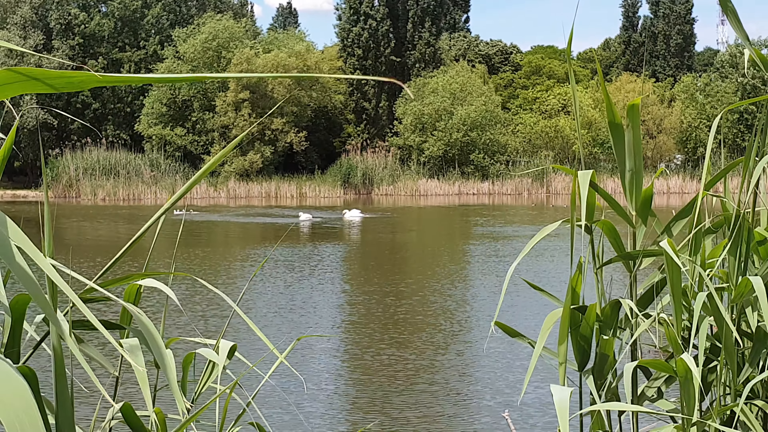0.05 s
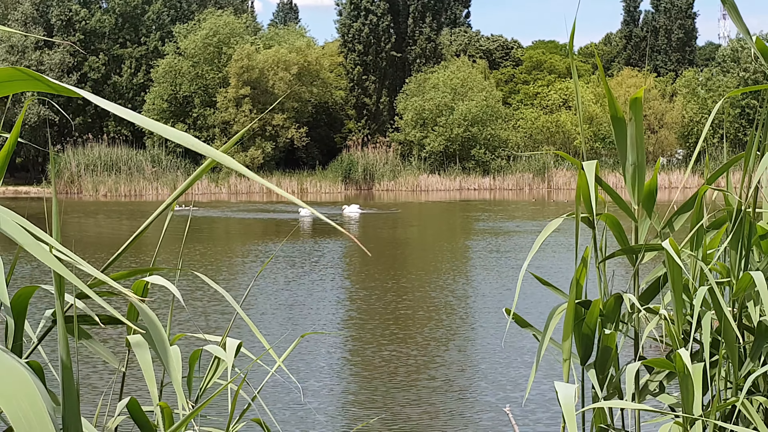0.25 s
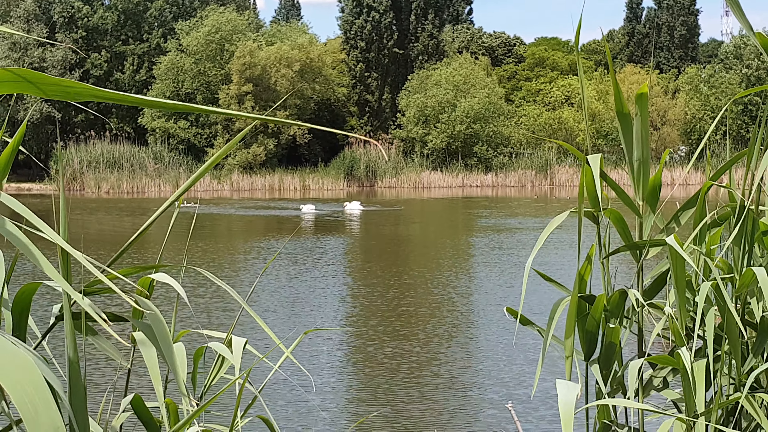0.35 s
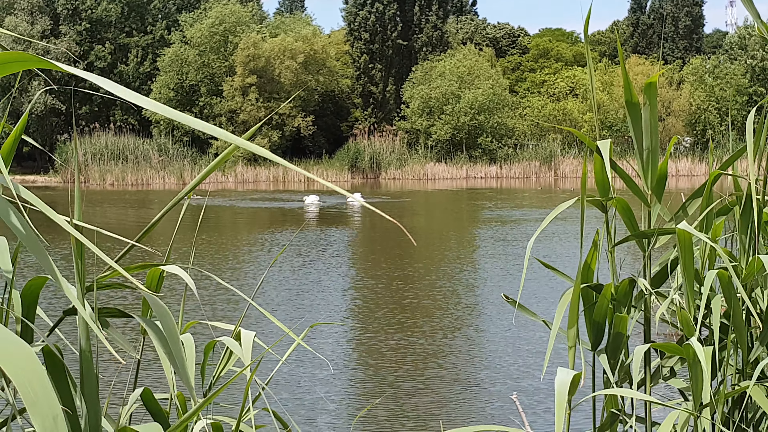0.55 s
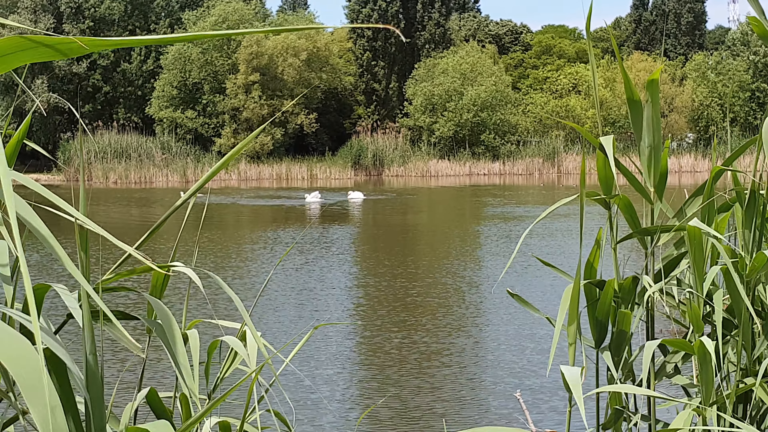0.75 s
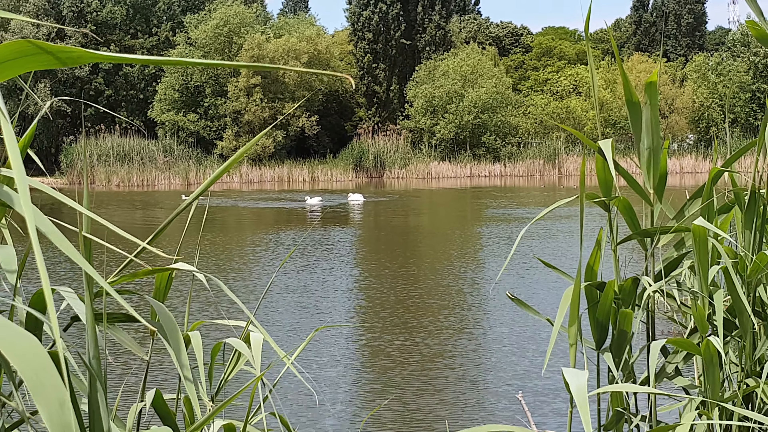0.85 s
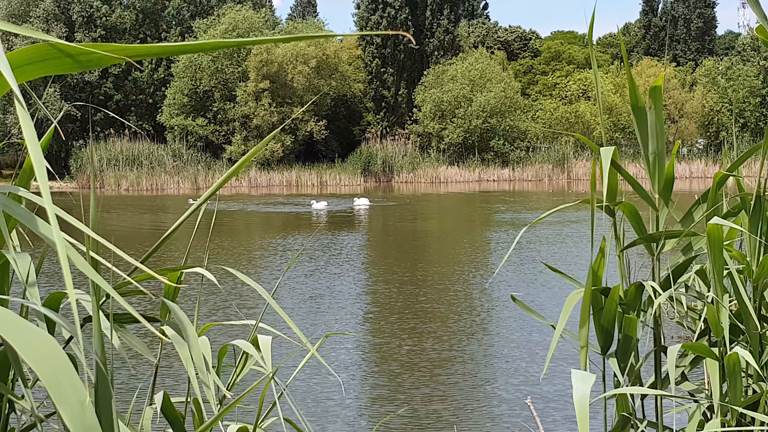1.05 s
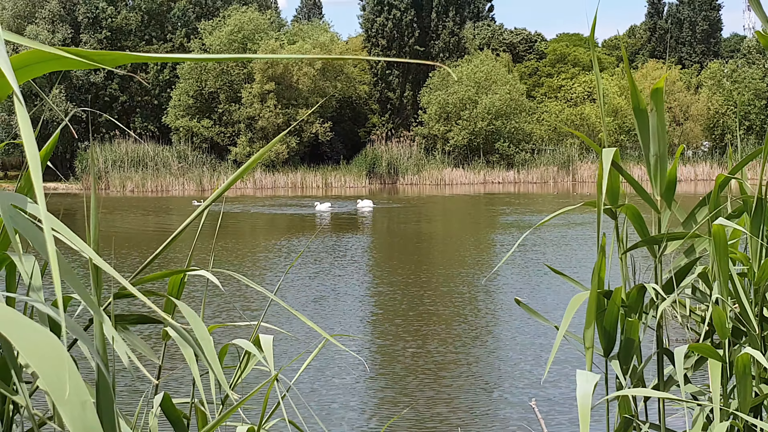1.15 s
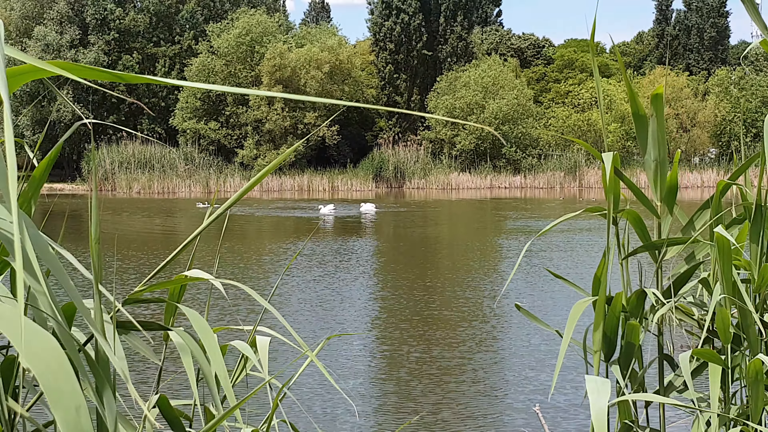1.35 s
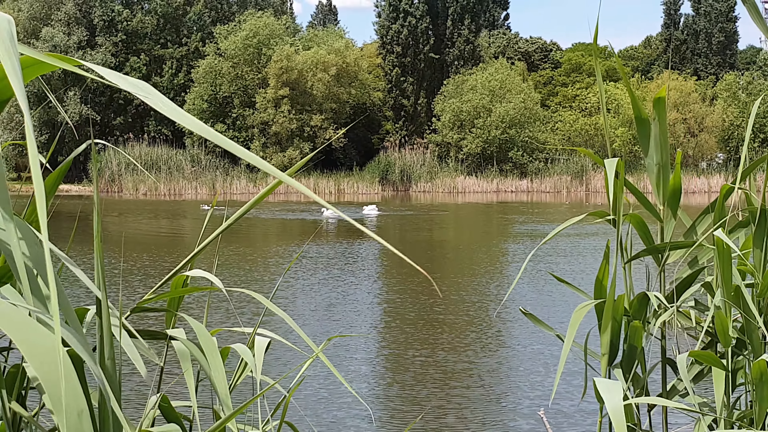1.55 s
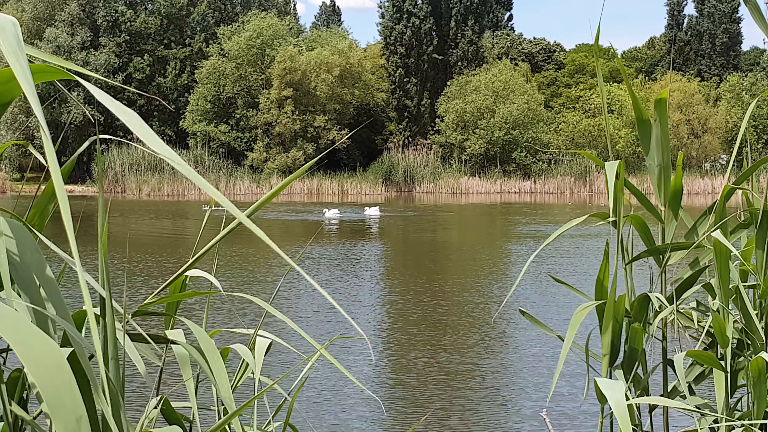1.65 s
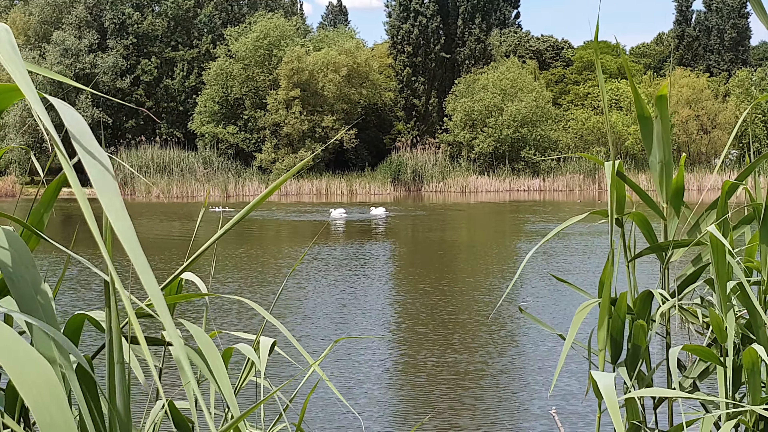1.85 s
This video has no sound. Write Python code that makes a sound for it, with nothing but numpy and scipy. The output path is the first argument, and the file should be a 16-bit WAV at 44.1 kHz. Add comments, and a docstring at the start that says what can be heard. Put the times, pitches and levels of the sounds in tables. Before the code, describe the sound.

Gusty wind thumps and rumbles on the microphone beside a reedy pond, with faint bird calls

```python
"""Wind at a reedy pond

A small microphone stands beside the pond; gusty wind buffets its two ports, mostly the right one:
low uneven cycles over filtered-noise rumble. In the reeds ringing ticks chatter, and late on a spray
of noise drops splashes. A bird chirps gliding overtones, early and at the end; far water birds call
hoarsely as resonant noise. Leaves and air hiss as random spectra; a far machine hums wavering tones."""
import sys
import numpy as np
from scipy import signal
from scipy.fft import rfft, irfft
from scipy.io import wavfile
from scipy.ndimage import uniform_filter1d

SR = 44100
rng = np.random.default_rng(int(sys.argv[2]) if len(sys.argv) > 2 else 0)


def wav_out(sig):
    """Save sig, one row per channel (or a flat mono array), as 16-bit PCM at SR to the path in sys.argv[1]."""
    wavfile.write(sys.argv[1], SR, np.round(np.clip(np.atleast_2d(sig).T, -1, 1) * 32767).astype(np.int16))


N = 83790  # 1.9 s
# phase lag of the right port, in turns, for every partial of the bird and the chatter
PORT_LAG_TURNS = np.array([[0], [0.26]])


def amp(db):
    """Amplitude factor for a level in dB."""
    return 10 ** (np.asarray(db) / 20)


def evened(x):
    """Scale each row to an RMS of 1."""
    return x / np.sqrt(np.mean(x ** 2, axis=-1, keepdims=True) + 1e-20)


def smoothed(x, samples):
    """Slow random drift: two running means, then an RMS of 1."""
    return evened(uniform_filter1d(uniform_filter1d(x, samples), samples))


def read(points, hz):
    """Read a frequency table on a logarithmic frequency axis."""
    f, value = np.transpose(points)
    return np.interp(np.log(hz + 1), np.log(f + 1), value)


def curve(table, column=1):
    """Gain over time from one dB column of a table."""
    columns = np.transpose(table)
    return amp(np.interp(np.arange(N) / SR, columns[0], columns[column]))


def coloured(x, colour):
    """Filter noise to a spectral shape, then even its level."""
    gain = amp(read(colour, np.fft.rfftfreq(N, 1 / SR)))
    return evened(irfft(rfft(x) * gain, N))


def resonate(x, hz, width_hz):
    """A gliding resonance: shift hz down to zero, low-pass with a double pole, shift back up."""
    turn = np.exp(2j * np.pi * np.cumsum(hz * np.ones(x.shape[-1])) / SR)
    pole = np.exp(-np.pi * width_hz / SR)
    double_pole = np.convolve([1, -pole], [1, -pole])
    return evened((turn * signal.lfilter([1], double_pole, x / turn)).real)


def add(mix, s, sound):
    """Lay a sound into the mix from s seconds, cut at the end of the scene."""
    part = mix[:, round(s * SR):][:, :sound.shape[-1]]
    part += sound[..., :part.shape[1]]


def sides(lean_db):
    """Left and right gains whose difference, left minus right, is lean_db."""
    return amp([[lean_db / 2], [-lean_db / 2]])


# partials of the flutter on a buffet's front: f/Hz before wobble, level/dB on top of the buffet's flutter
FLUTTER_PARTIALS = [(140, 2), (235, -8.5)]
FLUTTER_WOBBLE, FLUTTER_LEAD_S = 0.16, 0.0045
# pitch sag and random wobble as shares of the pitch; second harmonic and flapping as shares of the stroke
SAG, WOBBLE, LOPSIDED, FLAP = 0.24, 0.2, 0.1, 0.15


def buffets(table):
    """Each eddy pushes a port for lopsided, uneven cycles that sag in pitch, quicker flutter in front."""
    t, out = np.arange(N) / SR, np.zeros(N)
    slow, quick = smoothed(rng.standard_normal((2, N)), 250)
    for s, db, hz, length, flutter_db in table:
        start = rng.random(3)
        u = (t - s) / length
        pitch = hz * (1 - SAG * np.tanh(u)) * (1 + WOBBLE * slow)
        push = np.cumsum(pitch) / SR + start[0]
        stroke = np.cos(2 * np.pi * push)
        stroke += LOPSIDED * np.cos(2 * np.pi * (2 * push + start[1]))
        out += amp(db - 12.1 * u ** 2) * stroke * (1 + FLAP * quick)

        flutter_clock = np.cumsum(1 + FLUTTER_WOBBLE * quick) / SR
        front = u + FLUTTER_LEAD_S / length
        for (part_hz, part_db), part_start in zip(FLUTTER_PARTIALS, start[1:]):
            shape = amp(flutter_db + part_db - 18 * front ** 2)
            out += shape * np.cos(2 * np.pi * (part_hz * flutter_clock + part_start))
    return np.sqrt(2) * out


# buffets on each port: centre t/s, level/dB, f/Hz at the centre before wobble,
# length/s from the centre to 12.1 dB down, flutter level/dB before its partials' own levels
LEFT_BUFFETS = [(0.176, -37.5, 89, 0.018, -56), (0.241, -33.5, 76.7, 0.017, -44.5),
                (0.35, -39.5, 67.7, 0.013, -71), (0.459, -27.5, 125, 0.013, -65),
                (0.478, -20, 88, 0.012, -39), (0.522, -44, 74, 0.017, -75), (0.589, -38, 66, 0.06, -70),
                (0.692, -30, 69, 0.022, -65), (0.815, -35, 75, 0.021, -58), (0.908, -43, 74.8, 0.056, -68),
                (0.976, -37, 73, 0.017, -69), (1.064, -44, 60.5, 0.023, -67), (1.288, -38, 70, 0.016, -68),
                (1.388, -43, 68, 0.02, -54), (1.429, -37, 60, 0.011, -54), (1.466, -36.5, 64, 0.022, -66),
                (1.554, -37, 72.5, 0.036, -48.5), (1.588, -37.5, 71, 0.029, -70),
                (1.764, -38, 78.5, 0.0096, -55), (1.887, -39, 81, 0.022, -55)]
RIGHT_BUFFETS = [(0.398, -23, 62.53, 0.012, -38), (0.447, -39, 85, 0.013, -50),
                 (0.494, -25, 88, 0.024, -38.5), (0.519, -22, 89, 0.018, -32),
                 (0.568, -21.5, 106.8, 0.013, -26), (0.598, -35, 70, 0.012, -46),
                 (0.66, -25, 80, 0.028, -51), (0.707, -31, 84.55, 0.034, -59),
                 (0.759, -28.5, 84.85, 0.032, -33), (0.791, -24, 80.07, 0.038, -59),
                 (0.848, -35, 70.4, 0.021, -50), (0.879, -20, 70, 0.034, -28), (0.92, -18, 67, 0.02, -31),
                 (0.995, -24, 70.56, 0.024, -64), (1.082, -32.5, 65.85, 0.054, -73),
                 (1.136, -37, 97, 0.033, -47), (1.185, -29.5, 82, 0.021, -46.5),
                 (1.209, -31.5, 75.6, 0.02, -69), (1.255, -31.5, 61.3, 0.015, -62),
                 (1.29, -26.5, 68.3, 0.02, -50), (1.376, -20.5, 88.2, 0.035, -43),
                 (1.421, -23, 80.8, 0.018, -52), (1.512, -16.5, 91, 0.017, -33),
                 (1.572, -34, 75.2, 0.061, -60), (1.597, -45, 69.9, 0.038, -59),
                 (1.673, -36.5, 78.65, 0.045, -57), (1.807, -45, 93, 0.03, -74)]
# rumble between the buffets: t/s, left level/dB, right level/dB
RUMBLE_LEVELS = [(0.0, -43, -46), (0.1, -49, -50), (0.2, -37, -47), (0.3, -42.5, -48), (0.4, -42, -35),
                 (0.5, -35, -53), (0.6, -37.5, -30), (0.7, -41, -32.5), (0.8, -43, -33.5), (0.9, -36, -34),
                 (1.0, -42, -34), (1.1, -43, -40), (1.2, -46, -63), (1.3, -44, -29), (1.4, -39, -38),
                 (1.5, -52, -30), (1.6, -48, -49), (1.7, -45, -55.5), (1.8, -48, -37), (1.9, -43.5, -41.5)]
# spectral shape of the rumble: f/Hz, relative level/dB
RUMBLE_SHAPE = [(15, -32), (30, 8.5), (50, 8.5), (90, -0.5), (150, -3.5), (250, -21), (400, -99),
                (800, -63)]


def wind():
    """Turbulence at the microphone: rumble and buffets, unrelated on the two ports."""
    rumble = coloured(rng.standard_normal((2, N)), RUMBLE_SHAPE)
    rumble *= [curve(RUMBLE_LEVELS), curve(RUMBLE_LEVELS, column=2)]
    return rumble + [buffets(LEFT_BUFFETS), buffets(RIGHT_BUFFETS)]


# spray of the splash: t/s, level/dB
SPLASH_LEVELS = [(1.64, -67), (1.657, -55), (1.71, -53), (1.75, -50), (1.79, -52.5), (1.82, -60.5),
                 (1.85, -59), (1.89, -66)]
# spectral shape of the spray: f/Hz, relative level/dB per Hz
SPLASH_SHAPE = [(700, -27), (1050, -3), (2000, -3), (2700, -8.5), (3900, -3), (5200, -13), (8500, -24),
                (12000, -19), (15600, -22)]
# single loud drops: t/s, level/dB at the onset before the lean to the right, f/Hz
LOUD_DROPS = [(1.729, -39, 3870), (1.751, -37, 3920), (1.759, -46, 1100), (1.787, -42, 4040)]
DROPS_PER_S, DROP_SPREAD_DB = 3000, 3.5
PLOP_CYCLES = 3.6  # cycles in which a loud drop decays to 1/e


def splash():
    """A spray of drops of uneven size, as sparse filtered clicks, and a few decaying sine drops."""
    t = np.arange(N) / SR
    size = amp(DROP_SPREAD_DB * np.minimum(rng.exponential(1, N), 3))
    falls = rng.random(N) < DROPS_PER_S / SR
    drops = rng.standard_normal((2, N)) * size * falls
    out = coloured(drops, [(300, -48)] + SPLASH_SHAPE) * curve(SPLASH_LEVELS)
    out *= (t > SPLASH_LEVELS[0][0]) * (t < SPLASH_LEVELS[-1][0])
    for s, db, hz in LOUD_DROPS:
        turns = hz * t[:600]
        plop = np.exp(-turns / PLOP_CYCLES) * np.sin(2 * np.pi * turns)
        add(out, s, amp(db) * plop * sides(-9.0))
    return out


# syllables in the reeds: t/s, level/dB before attack, modes and lean, f/Hz
SYLLABLES = [(1.699, -40.5, 2243), (1.7403, -36.5, 2000), (1.7867, -39.5, 2100), (1.8324, -36.5, 2070),
             (1.878, -37, 2030)]
# ringing modes of a tick: f as a multiple of the syllable's pitch, level/dB on top of the syllable's
TICK_RINGS = [(.93, 2), (1.0, 4), (1.1, 3)]
TICK_GAP_S, TICK_FALL_DB = 0.0067, -10  # from one tick to the next
TICK_ATTACK_S, TICK_T60_S = 0.0061, 0.021


def chatter():
    """Each syllable is three short ringing ticks, each weaker than the one before."""
    out, t = np.zeros((2, N)), np.arange(2000) / SR
    attack = np.minimum(t / TICK_ATTACK_S, 1)
    for s, db, hz in SYLLABLES:
        for k in range(3):
            tick = 0
            for multiple, mode_db in TICK_RINGS:
                turns = multiple * hz * t + rng.random() - PORT_LAG_TURNS
                tick = tick + amp(mode_db) * np.sin(2 * np.pi * turns)
            decay = amp(db + k * TICK_FALL_DB - 60 * t / TICK_T60_S)
            add(out, s + k * TICK_GAP_S, decay * attack * tick)
    return out * sides(-2.1)


# bird notes: start t/s, length/s, first f/Hz, last f/Hz (both before jitter),
# level/dB before overtone and throat
BIRD_NOTES = [(0.077, 0.018, 1387, 1810, -59.5), (0.088, 0.012, 1133, 1255, -57),
              (0.102, 0.019, 1340, 1325, -57), (0.145, 0.029, 1221, 1143, -54.5),
              (0.271, 0.018, 1396, 1530, -59.5), (0.288, 0.025, 1148, 1185, -59),
              (0.315, 0.056, 1293, 1190, -51), (1.88, 0.028, 1074, 1130, -55)]
# overtones of a note: f as a multiple of the pitch, level/dB on top of the note's, left minus right/dB
BIRD_OVERTONES = [(2, -4, -6), (3, 0, 2), (4, -22, 3)]
FLATTEN = 1.47  # power of the glide
RISE_JITTER, NOTE_ROUGH = 0.1, 0.45  # pitch jitter as a share of the rise; level roughness
THROAT_HZ, THROAT_WIDE_HZ, THROAT_DB = 3580, 89, 7
ECHO_DB, ECHO_T60_S = -4, 0.35


def bird():
    """Flattening glides, ragged when rising, boosted at the throat's resonance, echoed off the trees."""
    out = np.zeros((2, N))
    jitter = evened(uniform_filter1d(rng.standard_normal(N + SR), 40))
    for s, length, first_hz, last_hz, db in BIRD_NOTES:
        u = np.linspace(0, 1, round(length * SR))
        hz = last_hz + (first_hz - last_hz) * (1 - u) ** FLATTEN
        rise_hz = max(last_hz - first_hz, 0)
        hz = hz + RISE_JITTER * rise_hz * jitter[round(s * SR):][:len(u)]
        turns = np.cumsum(hz) / SR
        swell = np.sin(np.pi * u ** 0.65) ** 0.35
        for k, overtone_db, lean_db in BIRD_OVERTONES:
            throat_db = THROAT_DB * np.exp(-((k * hz - THROAT_HZ) / THROAT_WIDE_HZ) ** 2)
            tone = np.sin(2 * np.pi * (k * turns - PORT_LAG_TURNS))
            add(out, s, amp(db + overtone_db + throat_db) * sides(lean_db) * swell * tone)
    out *= 1 + NOTE_ROUGH * smoothed(rng.standard_normal((2, N)), 150)

    t = np.arange(SR // 2) / SR
    tail = rng.standard_normal((2, len(t))) * amp(-60 * t / ECHO_T60_S)
    tail *= t > 0.008  # the echoes begin after 8 ms
    echoes = signal.fftconvolve(out, tail / np.linalg.norm(tail[0]), axes=1)[:, :N]
    return np.sqrt(2) * out + amp(ECHO_DB) * echoes


# far water birds: start t/s, length/s, first f/Hz, last f/Hz, level/dB of the main resonance
# before the lean, resonance width/Hz
FAR_CALLS = [(.0, 0.096, 2520, 2260, -59.5, 378), (0.573, 0.068, 2140, 2470, -53.5, 252),
             (0.657, 0.06, 1470, 1560, -53.5, 450), (0.692, 0.056, 1850, 2190, -53, 500),
             (0.718, 0.071, 2320, 2440, -52, 560), (0.791, 0.088, 2200, 2360, -55, 380),
             (.95, 0.075, 2140, 2500, -54.5, 520), (1.093, 0.087, 2130, 2560, -51.5, 520),
             (1.202, 0.037, 1880, 2100, -55, 378), (1.319, 0.046, 2027, 1900, -55, 90),
             (1.381, 0.044, 2000, 2350, -59, 300), (1.476, 0.026, 1970, 2020, -53.5, 378)]
CRY_LOW, CRY_LOW_DB, CRY_LEAN_DB = 0.63, -13, -1.5  # lower resonance: multiple of the pitch, level


def cries():
    """Breathy calls smeared by distance: noise in a gliding resonance and a weaker one below."""
    out = np.zeros((2, N))
    for s, length, first_hz, last_hz, db, width_hz in FAR_CALLS:
        u = np.linspace(0, 1, round(length * SR))
        hz = first_hz + (last_hz - first_hz) * u
        breath = rng.standard_normal((2, len(u)))
        voice = resonate(breath, hz, width_hz)
        voice += amp(CRY_LOW_DB) * resonate(breath, CRY_LOW * hz, width_hz)
        add(out, s, amp(db) * np.sin(np.pi * u) ** 0.5 * voice)
    return out * sides(CRY_LEAN_DB)


# likeness of the two ports in the hiss: f/Hz, left-right correlation
PORT_LIKENESS = [(60, -0.078), (130, 0.025), (290, 1), (640, 0.42), (1410, -0.073), (3100, -0.098),
                 (6820, 0.077), (15000, -0.0046)]
# balance of the hiss: f/Hz, left minus right/dB
HISS_LEAN = [(200, 0), (700, 2), (1300, -1.5), (2400, -3), (4400, -1), (8100, 3.5), (15000, 4)]
# slow brightening of the hiss: f/Hz, level change/dB per s
HISS_BRIGHTENING = [(200, -3), (700, -2), (2000, -0.5), (6000, -0.5), (11000, 2.5)]
PATCH_DB = 1.82  # RMS depth of the drifting patches


def hiss(colour):
    """Noise from random short-time spectra with drifting patches, partly alike on the two ports."""
    frames, hz = N // 128 + 5, np.fft.rfftfreq(512, 1 / SR)
    a, b, c, d, patches = rng.standard_normal((frames, 257, 5)).T
    # smooth over neighbouring frequencies, then over time
    patches = evened(uniform_filter1d(uniform_filter1d(patches, 6, 0), 16, 1))
    same = np.clip(read(PORT_LIKENESS, hz), -1, 1)[:, None]
    left, other = a + 1j * b, c + 1j * d
    right = same * left + np.sqrt(1 - same ** 2) * other
    spectra = np.array([left, right])
    lean_db = read(HISS_LEAN, hz)[:, None] * [[[0.5]], [[-0.5]]]
    spectra *= amp(read(colour, hz)[:, None] + PATCH_DB * patches + lean_db)
    spectra *= amp(np.outer(read(HISS_BRIGHTENING, hz), np.arange(frames) * 128 / SR))
    x = signal.istft(spectra, nperseg=512, noverlap=384)[1][:, :N]
    return x / x.std()


# leaves rustling: t/s, level/dB
LEAF_LEVELS = [(0.0, -91), (0.104, -65), (0.242, -97), (0.28, -70), (0.576, -69.5), (0.598, -67),
               (0.846, -63.5), (0.856, -58.5), (0.968, -68), (0.984, -64), (1.11, -79), (1.254, -63),
               (1.486, -68.5), (1.63, -64.5), (1.66, -81), (1.688, -61), (1.762, -58.5), (1.814, -66),
               (1.888, -65), (1.9, -59)]
# spectral shape of the leaves: f/Hz, relative level/dB per Hz
LEAF_SHAPE = [(1760, 18), (3000, -62), (3610, -40.5), (3930, 12), (4900, 4.5), (7150, 4.5), (14000, -8.5),
              (15600, -39)]


def leaves():
    """Rustling leaves: hiss mostly above 3 kHz that swells and fades."""
    return curve(LEAF_LEVELS) * hiss([(1500, -36)] + LEAF_SHAPE)


# spectral shape of the background air: f/Hz, relative level/dB per Hz
AIR_SHAPE = [(120, -47), (200, -17), (268, -6.5), (422, -10), (480, -3), (666, -13), (860, -6.5),
             (959, -10.5), (1510, -15.5), (2100, -13.5), (2710, -18.5), (3830, -17), (5230, -28),
             (10800, -37.5), (15600, -42.5)]
AIR_DB = -51.5


def air():
    """A continuous bed of hiss behind everything."""
    return amp(AIR_DB) * hiss(AIR_SHAPE)


# tones of the far machine: f/Hz
HUM_TONES = [480.5, 721.7, 839, 863]
# the same tones: level/dB before the level curve and lean, RMS pitch waver/Hz
HUM_STRENGTHS = [(-64, 9.36), (-66.5, 6.77), (-66.5, 2.8), (-59.5, 2.27)]
# level curve of the whole hum: t/s, level/dB on top of the tones' own
HUM_CURVE = [(0, 1), (.3, 2), (.78, 2.5), (.95, -3), (1.3, -0.5), (1.9, -1.5)]


def hum():
    """A far machine: sine tones whose pitch wavers a little."""
    out = np.zeros(N)
    for hz, (db, waver_hz) in zip(HUM_TONES, HUM_STRENGTHS):
        waver = smoothed(rng.standard_normal(N), 1500)
        turns = np.cumsum(hz + waver_hz * waver) / SR + rng.random()
        out += np.sqrt(2) * amp(db) * np.sin(2 * np.pi * turns)
    return out * curve(HUM_CURVE) * sides(2.2)


def scene():
    """Everything reaching the microphone, from the wind at its ports to the far machine."""
    return wind() + splash() + chatter() + bird() + cries() + leaves() + air() + hum()


LOW_CUT_HZ, EDGE_HZ = 33.6, 15750


def record(dry):
    """The microphone's low cut, then the band limit."""
    low_cut = signal.butter(N=4, Wn=LOW_CUT_HZ, btype="high", fs=SR, output="sos")
    band_limit = signal.firwin(511, EDGE_HZ, window=("kaiser", 9), fs=SR)
    return signal.oaconvolve(signal.sosfilt(low_cut, dry), band_limit[None], "same")


dry = scene()
out = record(dry)
wav_out(out)
```